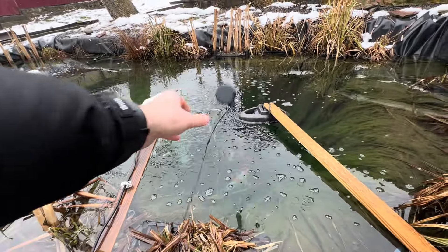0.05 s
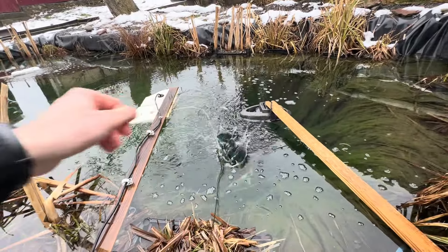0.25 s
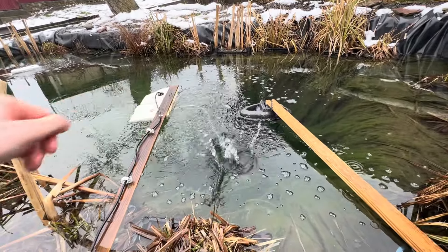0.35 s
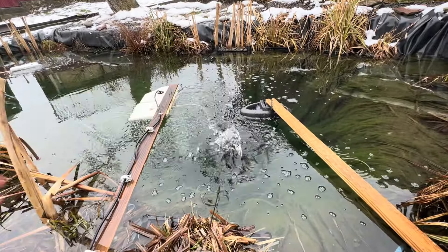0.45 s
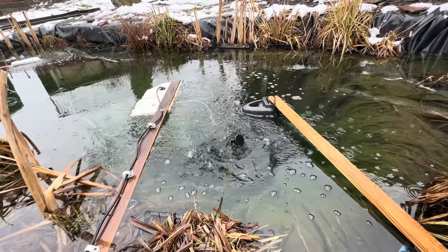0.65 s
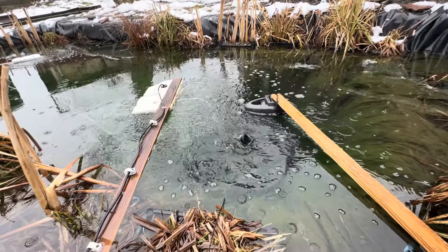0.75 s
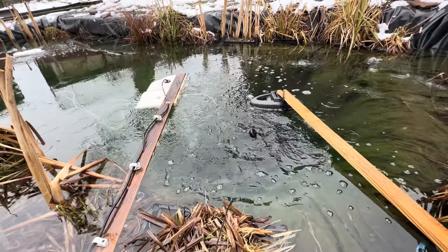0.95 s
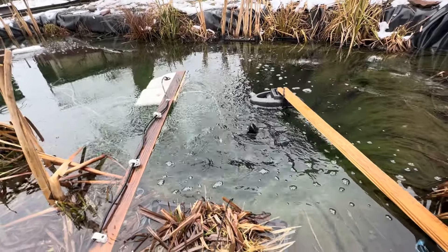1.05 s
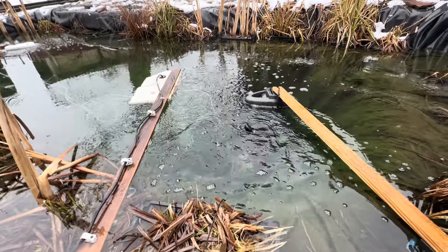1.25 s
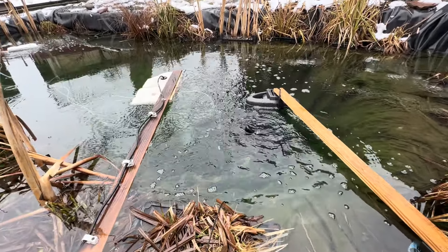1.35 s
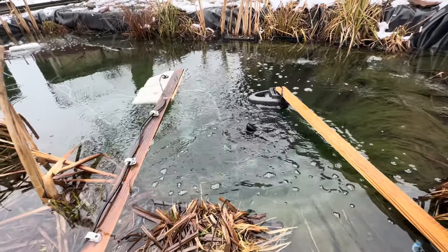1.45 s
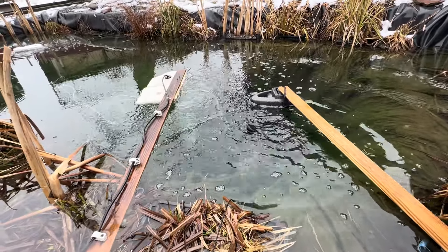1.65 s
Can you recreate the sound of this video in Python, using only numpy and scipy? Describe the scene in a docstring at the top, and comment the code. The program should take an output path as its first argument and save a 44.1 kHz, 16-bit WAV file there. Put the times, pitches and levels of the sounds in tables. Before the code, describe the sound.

A single splash and deep plop sound as something lands in a pond, followed by a brief sprinkle of falling drops. Near the microphone a jacket rustles and flaps, over the faint rumble of a quiet yard.

```python
"""At a garden pond, a small heavy object is tossed into the water. It slaps the surface, the air pocket
behind it pinches off with a gulp, and the jet that springs up falls back as drops and ringing bubbles.
Close by, a jacket sleeve swishes and flaps as the arm comes back.
The yard is quiet, with a low rumble and a faint hum."""
import sys
import numpy as np
from scipy import signal
from scipy.fft import rfft, irfft
from scipy.io import wavfile

SR = 44100
rng = np.random.default_rng(int(sys.argv[2]) if len(sys.argv) > 2 else 0)


def to_wav(sig):
    """Store sig (one row per channel, or 1-D mono) as 16-bit WAV at the path in sys.argv[1].

    Samples outside -1..1 are clipped; the rate is SR.
    """
    pcm = np.clip(np.atleast_2d(sig), -1, 1) * 32767
    pcm = np.round(pcm).astype(np.int16)
    wavfile.write(sys.argv[1], SR, pcm.T)  # frames by channels


N = 74970
T = np.arange(N) / SR
BINS = np.maximum(np.fft.rfftfreq(2 * N, 1 / SR), 1)  # frequencies in Hz that the filters work on
POND_LAG_S, SLEEVE_LAG_S, SLIDE_LAG_S = 0.00013, 0.00015, 0.0003255  # extra time to reach the right ear

# slaps on the water: t/s, level/dB, length/s, low edge f/Hz
WATER_SLAPS = [(0.2319, -27, 0.0065, 2100), (0.306, -23.5, 0.0012, 1450), (0.324, -34.5, 0.0063, 2040),
               (0.3274, -31.5, 0.003, 900), (0.354, -60, 0.0015, 3000), (0.357, -43.5, 0.011, 2490),
               (0.445, -43.5, 0.0024, 700), (.5780, -28, 0.0013, 7500), (0.595, -26.5, 0.0011, 6700),
               (0.603, -28.5, 0.0024, 3500), (0.6522, -30.5, 0.0013, 6500), (.7390, -36.5, 0.00091, 1480),
               (0.786, -42, 0.0026, 5200)]
# their colour, meaning how strong the low and high sounds are: f/Hz, level/dB
SLAP_SPECTRUM = [(500, -10), (1200, 3), (1700, -3), (2300, 10.5), (3300, 1.5), (4200, 4.5), (6000, -5.5),
                 (7500, 1.5), (9500, -1.5), (11500, -25), (13000, -8.5), (15500, -12)]
# trapped air bubbles: t/s, f/Hz, relative level/dB, time to fade 60 dB/s, pitch change/(share per s)
AIR_BUBBLES = [(.2337, 5800, -16.5, 0.0085, 1), (.2362, 2320, -23.5, 0.014, 13),
               (.3075, 917, -25.5, 0.044, 0.5), (.3078, 5760, -22.5, 0.0069, -2),
               (.3100, 2510, -29.5, 0.031, -8), (.3275, 1123, -23, 0.021, 3.5),
               (.3280, 5780, -16.5, 0.0089, 0), (.3295, 817, -29, 0.026, -1.5),
               (0.347, 4150, -24.5, 0.0071, 12), (.3645, 2880, -36.5, 0.032, 18.5),
               (.3725, 2510, -36, 0.026, 26), (.3920, 2260, -45, 0.023, -5), (.4060, 2060, -46, .03, 7),
               (.4435, 1320, -41, 0.038, -0.5), (.4440, 2510, -43, .02, 7), (0.451, 256.8, -55, 0.63, .5),
               (0.471, 3630, -37, 0.011, -2), (.5272, 780, -34, 0.059, 5.5),
               (.5298, 1013, -33.5, 0.034, 4.5), (.5808, 982, -39.5, 0.068, 3),
               (.5860, 1175, -34, 0.045, 9), (.6045, 2910, -25, 0.015, -7), (.6245, 2150, -33.5, 0.022, 24),
               (.6395, 2720, -31, 0.014, 25), (.6402, 738, -41, 0.11, 0), (.6410, 1126, -43.5, .06, 4),
               (.6710, 434, -42.5, 0.03, -3.5), (.6735, 1820, -37, 0.022, -1),
               (.7395, 1102, -24.5, 0.025, -8), (.7535, 1060, -36, .05, 4), (.7610, 3630, -40.5, 0.033, 65),
               (1.2150, 788, -49, 0.13, -0.5)]
# fine spray raining back: t/s, level/dB
SPRAY_LEVEL = [(.235, -59), (.29, -54.5), (.335, -55), (.38, -62), (.43, -56.5), (.56, -51), (.61, -45.5),
               (.66, -52), (.72, -58.5), (.9, -83)]
# mist fizzing on the surface: t/s, level/dB
FIZZ_LEVEL = [(.22, -100), (.24, -53), (.34, -57), (.45, -64), (.62, -61), (.8, -63), (1.1, -85)]
# colour of the fizz: f/Hz, level/dB
FIZZ_SPECTRUM = [(3000, -20), (7000, 0), (9500, 8), (11500, -22), (13500, -2), (15500, -8)]

# jacket rustling while the arm is out: t/s, level/dB
RUSTLE_LEVEL = [(0, -57), (.2, -51.5), (.45, -54.5), (.7, -49), (.85, -50), (.97, -47.5), (1.1, -49.5),
                (1.16, -55), (1.25, -52), (1.55, -80)]
# colour of the rustle: f/Hz, level/dB
RUSTLE_SPECTRUM = [(100, -17), (300, -2), (600, 0.5), (1100, -1), (1700, -6), (2800, -5.5), (4000, -11.5),
                   (5600, -12), (9500, -12.5), (11500, -40), (13500, -31), (16000, -37)]
# one quick swish of cloth: t/s, level/dB
SWISH_LEVEL = [(.95, -57.5), (.991, -45), (.998, -37), (1.03, -33), (1.039, -30), (1.05, -41.5),
               (1.062, -39.5), (1.1, -48.5), (1.135, -84)]
# colour of the swish: f/Hz, level/dB
SWISH_SPECTRUM = [(100, -15), (200, -8), (400, -10), (620, -2), (850, -13), (1350, 2), (2400, -3.5),
                  (3100, -12), (3500, -9), (4100, -13), (5000, -8.5), (8600, -8.5), (11200, -31),
                  (13000, -15), (15500, -19)]
# cloth catching and scraping: t/s, level/dB, width/s
CLOTH_SCRAPES = [(.9985, -41.5, 0.0044), (1.042, -29, 0.0013), (1.05, -35.5, 0.0039)]
# colour of the scrapes: f/Hz, level/dB
SCRAPE_SPECTRUM = [(500, -39), (2000, -10), (4000, -8), (5200, 9.5), (6500, -7), (8700, 7), (11500, -17),
                   (15000, -8)]
# sleeve sliding over the jacket: t/s, level/dB
SLIDE_LEVEL = [(1.15, -73), (1.26, -53.5), (1.39, -43), (1.49, -44.5), (1.545, -57), (1.61, -76),
               (1.7, -59)]
# colour of the slide: f/Hz, level/dB
SLIDE_SPECTRUM = [(100, -22), (250, -8), (500, -1), (800, -1), (1400, 0.5), (2350, -5.5), (2750, -1),
                  (3200, -3.5), (3700, -9.5), (5200, -10.5), (9600, -10.5), (11500, -33.5), (14600, -36),
                  (16000, -31)]
# cloth flapping tight: t/s, level/dB
CLOTH_FLAPS = [(1.0365, -27.5), (1.0526, -34.5), (1.1495, -28), (1.1775, -40), (1.1836, -33), (1.221, -44),
               (1.535, -58)]
# tones in a flap's knock: f/Hz, relative level/dB, time to fade 60 dB/s
KNOCK_TONES = [(196, -6, 0.04), (602, -7.5, 0.04), (1120, 0, 0.022), (1960, 2, .012)]
# colour of a flap's snap: f/Hz, level/dB
SNAP_SPECTRUM = [(150, -9), (1200, -1), (2200, -1.5), (3500, -5), (6000, -9.5), (9000, -16), (11500, -38),
                 (15000, -30)]

# echoes off the planks and the bank: left delay/s, right delay/s, level/dB
POND_ECHOES = [(.0031, .0022, -13), (.0068, .0059, -16), (.0205, .0212, -16)]
# colour of still outdoor air: f/Hz, level/dB
AIR_SPECTRUM = [(20, -31), (50, -7), (100, -3), (130, -10), (250, -7), (400, -10.5), (650, -15),
                (1100, -14.5), (1600, -21.5), (4500, -24), (5600, -22), (10000, -26), (11500, -51),
                (15000, -36)]
# deep rumble: t/s, level/dB
RUMBLE_LEVEL = [(0, -60), (.7, -59.5), (.81, -50), (.9, -58.5), (1.05, -57), (1.7, -64)]
# colour of the rumble: f/Hz, level/dB
RUMBLE_SPECTRUM = [(20, -66), (45, -5.5), (70, -6.5), (110, -16), (300, -19), (2000, -80)]
# how alike the left and right noise are: f/Hz, likeness from 0 to 1
STEREO_LIKENESS = [(60, 0.41), (250, 0.71), (1400, 0.48), (3100, 0.52), (7000, 0.2), (15000, 0)]
# how much louder the left side is than the right: f/Hz, level/dB
STEREO_BALANCE = [(100, .5), (300, 1.5), (800, 5.5), (1300, 5), (2700, -3), (4000, 1.5), (5400, 5.5),
                  (7200, 5.5), (9300, -5.5), (12000, -1)]


def slaps(attack_s=0.0002, decay_share=0.49):
    """Each hit on the water is a bright crackle that holds for its length, then dies away."""
    crackle, out = noise(SLAP_SPECTRUM, POND_LAG_S), 0
    for s, db, length, low_hz in WATER_SLAPS:
        rise = 1 - np.exp(-since(s) / attack_s)
        fall = np.exp(-since(s + length) / (decay_share * length))
        cut_lows = signal.butter(3, low_hz, "high", fs=SR, output="sos")
        out = out + from_db(db) * signal.sosfilt(cut_lows, crackle * (rise * fall) + 1e-18)
    return out


def gulp(start_s=.3295, start_hz=1230, end_hz=178.3, glide_s=0.0016):
    """The air pocket behind the object closes into one big bubble, its tone dropping as it deepens."""
    hz = end_hz + (start_hz - end_hz) * np.exp(-since(start_s) / glide_s)
    return from_db(-12.5) * tone(start_s, hz, swell_s=0.015, fade_s=0.059)


def bubbles(boost_db=2):
    """Trapped air rings like tiny bells; many bubbles rise in pitch as they near the surface."""
    out = 0
    for s, hz, db, fade_s, change in AIR_BUBBLES:
        pitch = hz * (1 + change * np.minimum(since(s), fade_s))
        out = out + from_db(db + boost_db) * tone(s, pitch, swell_s=0.00035, fade_s=fade_s)
    return out


def spray(drops_per_s=900, ring_cycles=4.7, low_hz=2000, high_hz=9000, spread_db=3.5, pitches=20):
    """Tiny droplets land at random, each ringing for a few cycles."""
    sizes = from_db(spread_db * np.minimum(rng.exponential(1, N), 3.5)) * rng.choice([-1, 1], N)
    drops = sizes * (rng.random(N) < drops_per_s / SR)
    which_pitch, out = rng.integers(0, pitches, N), 0
    for k, hz in enumerate(np.geomspace(low_hz, high_hz, pitches)):
        decay = np.exp(-np.log(1000) * hz / (ring_cycles * SR))
        angle = 2 * np.pi * hz / SR
        ringing = [1, -2 * decay * np.cos(angle), decay * decay]  # a filter that rings at hz
        out = out + signal.lfilter([0, np.sin(angle)], ringing, drops * (which_pitch == k) + 1e-18)
    return rms_one(out) * level(SPRAY_LEVEL) * (T > WATER_SLAPS[0][0])


def fizz():
    """The finest mist lands on the pond with a high hiss."""
    return level(FIZZ_LEVEL) * noise(FIZZ_SPECTRUM, POND_LAG_S, grain_db=1.0)


def sleeve():
    """Rubbing cloth rustles, swishes once with short bright scrapes, then slides smoothly."""
    rustle = level(RUSTLE_LEVEL) * noise(RUSTLE_SPECTRUM, SLEEVE_LAG_S, grain_db=2.5)
    slide = level(SLIDE_LEVEL) * noise(SLIDE_SPECTRUM, SLIDE_LAG_S, grain_db=0.9)
    swish = level(SWISH_LEVEL) * noise(SWISH_SPECTRUM, SLEEVE_LAG_S, grain_db=3.5)
    swishing = (T > SWISH_LEVEL[0][0]) & (T < SWISH_LEVEL[-1][0])
    catches = sum(from_db(db) * np.exp(-.5 * ((T - s) / width) ** 2) for s, db, width in CLOTH_SCRAPES)
    scrapes = catches * noise(SCRAPE_SPECTRUM, SLEEVE_LAG_S, grain_db=1.5)
    return rustle + slide + swish * swishing + scrapes


def flaps(snap_db=-5.5, snap_s=.003, swell_cycles=0.27):
    """Cloth pulls tight with a snap and a hollow knock whose low tones swell last."""
    hiss, out = noise(SNAP_SPECTRUM, SLEEVE_LAG_S), 0
    for s, db in CLOTH_FLAPS:
        knock = sum(from_db(tone_db) * tone(s, hz, swell_cycles / hz, fade_s)
                    for hz, tone_db, fade_s in KNOCK_TONES)
        snap = from_db(snap_db) * hiss * (T > s) * np.exp(-since(s) / snap_s)
        out = out + from_db(db) * (from_left(knock, SLEEVE_LAG_S) + snap)
    return out


def echoes(x):
    """Sound bounces off the planks and the bank, and scatters nearby and around the yard."""
    bounces = sum(from_db(db) * delayed(x, np.array([[left], [right]]))
                  for left, right, db in POND_ECHOES)
    near = from_db(-4) * scatter(x, fade_s=0.041, delay_s=0.0012)
    far = from_db(-14) * scatter(x, fade_s=.18, delay_s=.012)
    return bounces + near + far


def scatter(x, fade_s, delay_s, dull_hz=6500):
    """Many tiny echoes blur into a dull tail, one for each ear."""
    tail = rng.standard_normal((2, N)) * (T > delay_s) * fade(T, fade_s)
    tail = tail / np.sqrt(np.sum(tail ** 2, axis=1, keepdims=True))
    return filtered(x, rfft(tail, 2 * N) / (1 + 1j * BINS / dull_hz))


def yard(air_db=-56.5, hum_hz=99.46, hum_db=-61):
    """Still outdoor air, a deep rumble and a faint hum."""
    air = from_db(air_db) * noise(AIR_SPECTRUM)
    rumble = level(RUMBLE_LEVEL) * noise(RUMBLE_SPECTRUM)
    hum = from_db(hum_db) * np.sqrt(2) * np.sin(2 * np.pi * hum_hz * T)
    return air + rumble + hum


def noise(colour, lag_s=0, grain_db=0):
    """Coloured stereo noise of strength 1; grain_db roughens it with tiny random jumps in level."""
    grains = from_db(grain_db * np.repeat(rng.standard_normal(N // 24 + 1), 24)[:N])
    alike = np.clip(over_hz(STEREO_LIKENESS), 0, .98)
    gains = from_db(over_hz(colour)) * np.sqrt([1 + alike, 1 - alike])
    shared, side = filtered(rng.standard_normal((2, N)) * grains, gains)
    return rms_one(np.array([shared + side, delayed(shared - side, lag_s)]))


def tone(s, hz, swell_s, fade_s):
    """A pure tone that swells and dies away from time s, following the pitch hz."""
    t = since(s)
    wave = np.sin(2 * np.pi * np.cumsum(hz * (t > 0)) / SR)
    return wave * (1 - np.exp(-t / swell_s)) * fade(t, fade_s)


def fade(t, fade_s):
    """A gain that falls 60 dB every fade_s, down to -240 dB."""
    return from_db(-60 * np.minimum(t / fade_s, 4))


def since(s):
    """Time since s, zero before."""
    return np.maximum(T - s, 0)


def from_db(db):
    """Turn decibels into a gain, a number to multiply by."""
    return 10 ** (np.asarray(db) / 20)


def rms_one(x):
    """Scale to an average strength (rms) of 1."""
    return x / np.sqrt(np.mean(x ** 2) + 1e-20)


def level(rows):
    """Gain over time from a t/s, level/dB table."""
    return from_db(np.interp(T, *np.transpose(rows)))


def over_hz(points):
    """Fill in an f/Hz, value table at every frequency."""
    hz, value = np.transpose(points)
    return np.interp(np.log(BINS), np.log(hz), value)


def filtered(x, response):
    """Multiply each frequency in x by its response."""
    return irfft(rfft(x, 2 * N) * response)[..., :N]


def delayed(x, lag_s):
    """The same sound, lag_s later."""
    return filtered(x, np.exp(-2j * np.pi * BINS * lag_s))


def from_left(x, lag_s):
    """A sound on the left reaches the right ear later."""
    return np.array([x, delayed(x, lag_s)])


def scene():
    """The splash and its echoes, the jacket and the quiet yard."""
    water = slaps() + from_left(bubbles() + spray(), POND_LAG_S)
    splash = water + echoes(water) + fizz() + from_left(gulp(), POND_LAG_S)
    return splash + sleeve() + flaps() + yard()


def record(dry, cutoff_hz=16200):
    """Each side of the microphone has its own colour; the highest treble is cut."""
    tilt_db = over_hz(STEREO_BALANCE) / 2
    coloured = filtered(dry, from_db([tilt_db, -tilt_db]))
    cut_highs = signal.ellip(10, .1, 80, cutoff_hz, fs=SR, output="sos")
    return signal.sosfilt(cut_highs, coloured)


dry = scene()
out = record(dry)
to_wav(out)
```